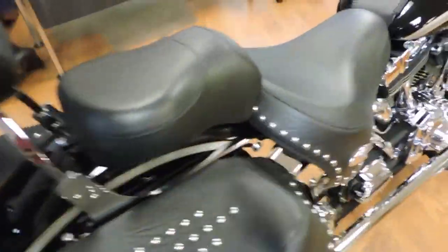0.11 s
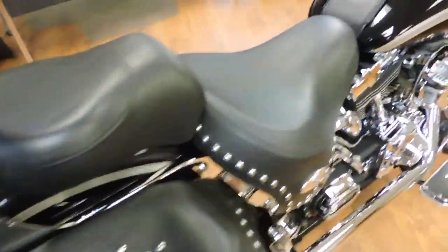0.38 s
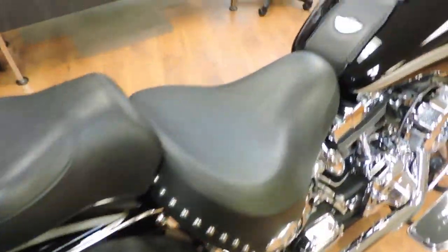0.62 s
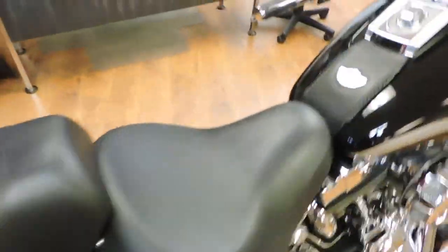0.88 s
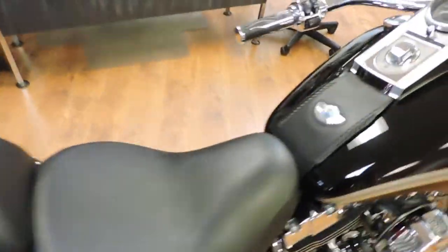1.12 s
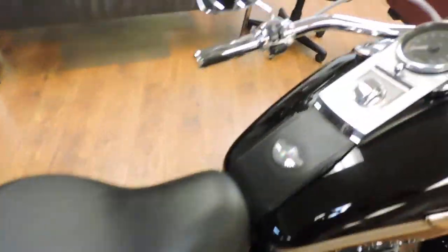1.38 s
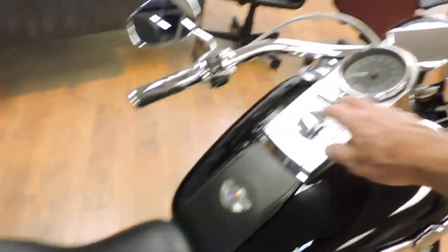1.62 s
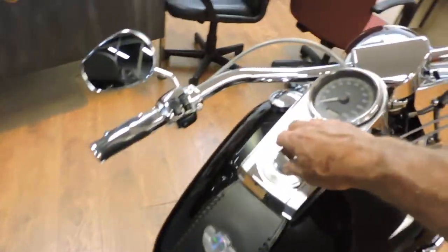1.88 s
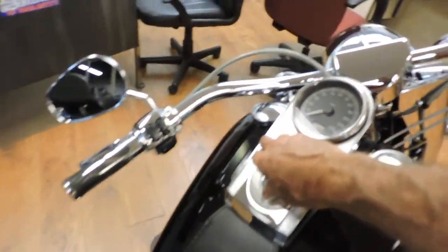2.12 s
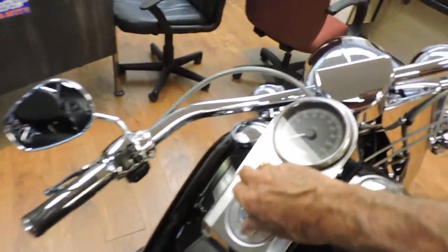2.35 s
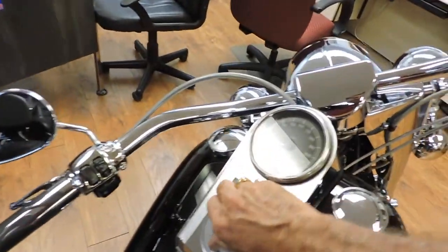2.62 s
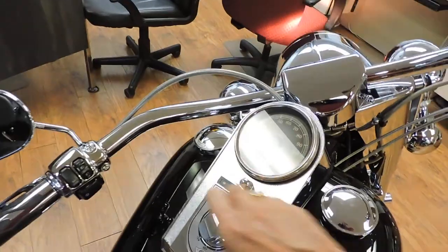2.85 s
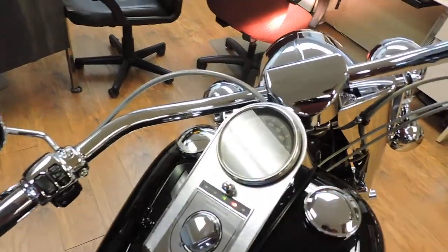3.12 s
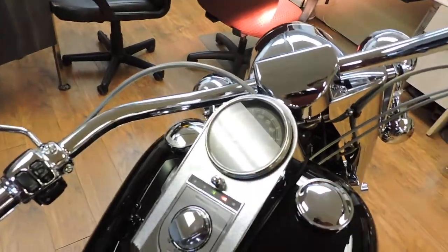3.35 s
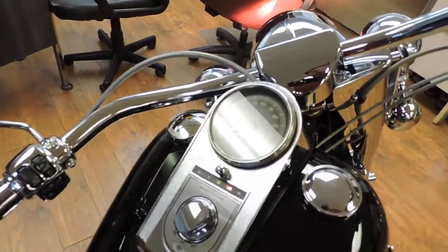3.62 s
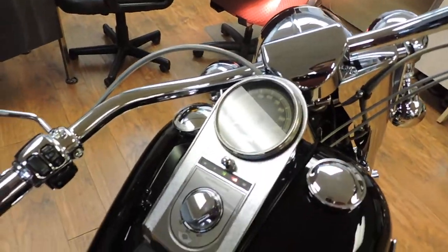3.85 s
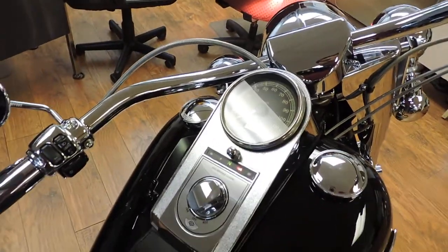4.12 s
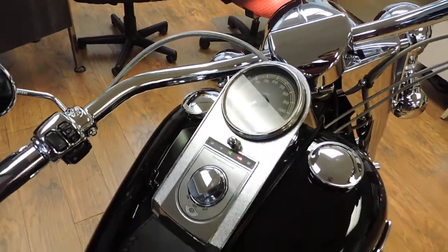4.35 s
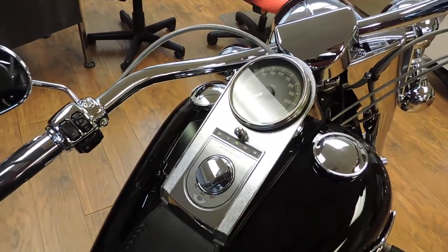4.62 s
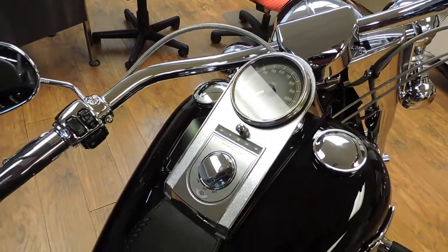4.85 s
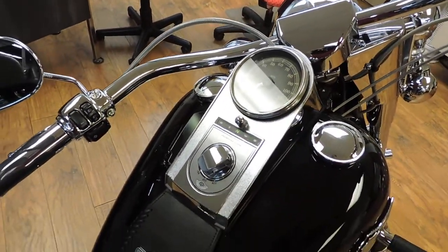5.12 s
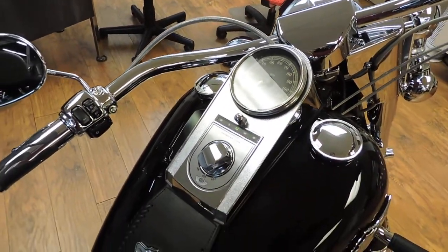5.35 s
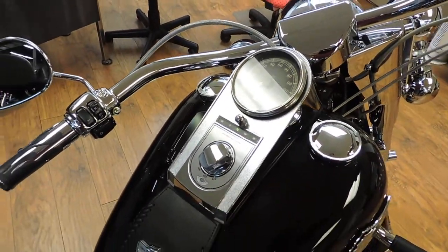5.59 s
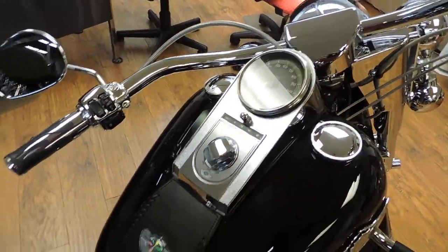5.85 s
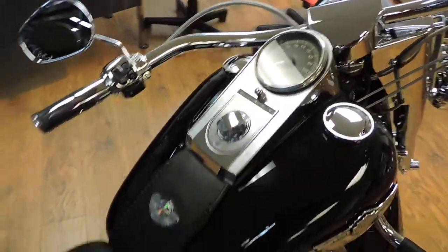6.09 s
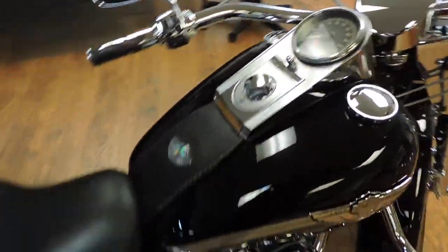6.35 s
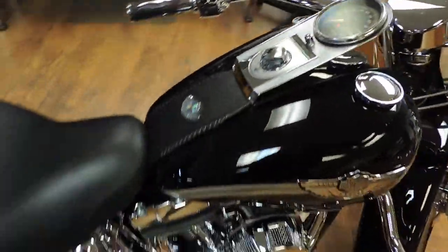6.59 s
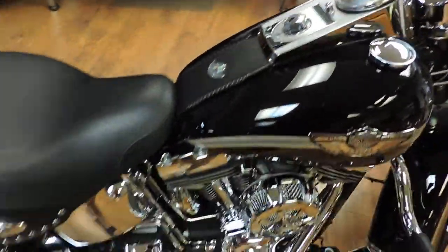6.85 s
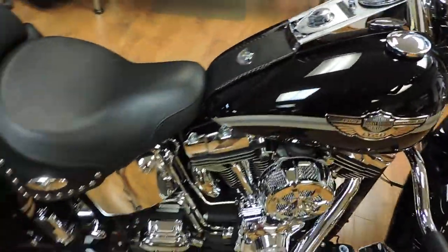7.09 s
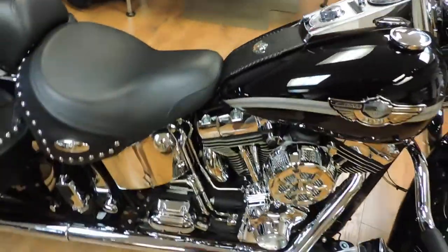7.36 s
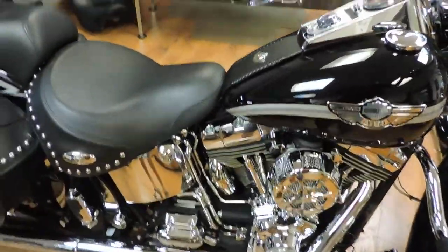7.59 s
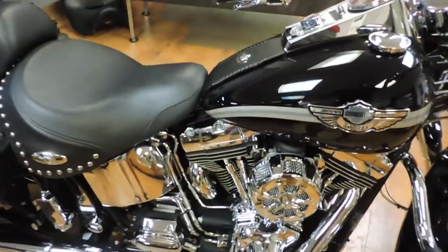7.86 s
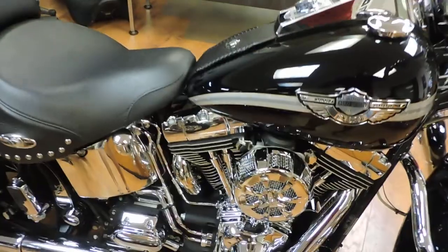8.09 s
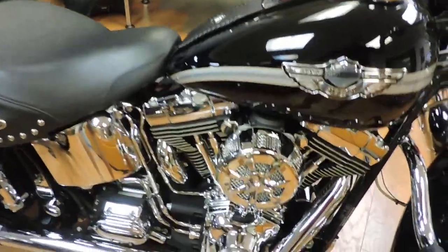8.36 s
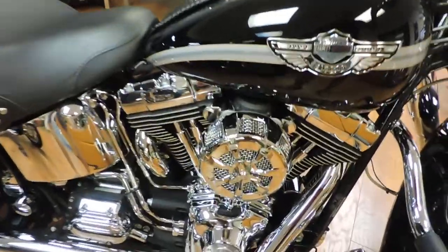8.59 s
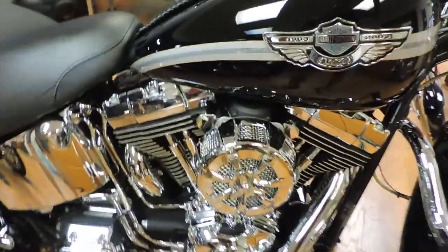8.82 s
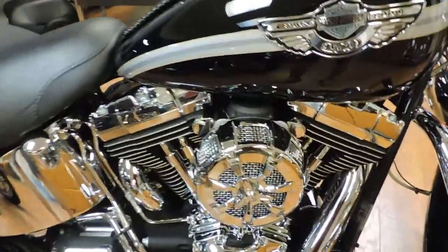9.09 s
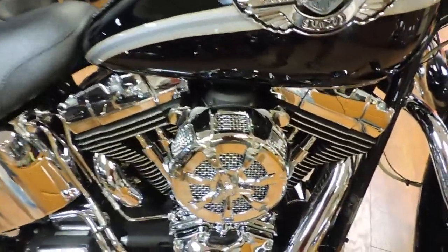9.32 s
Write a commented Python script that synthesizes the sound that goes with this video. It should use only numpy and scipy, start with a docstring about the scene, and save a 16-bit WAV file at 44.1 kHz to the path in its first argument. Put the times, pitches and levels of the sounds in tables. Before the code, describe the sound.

Quiet ventilation first, then a sharp double clack of a console switch. Later a solenoid click, heavy gear slam and labouring starter whine lead into deep motorcycle exhaust thumps. Two throttle blips swell into a booming, barking roar, each falling back, before an uneven idle with metallic ringing and valve clatter. Heard very close, with short reflections from hard walls.

```python
"""A motorcycle starts in a showroom

A big V-twin starts close by: switch contacts crack and ring the console, then the starter slams in and cranks
with noise and a gliding whine. The engine catches, is blipped twice and falls to a loping idle: each firing
thumps the pipe, rings the metal shells and spits noise, while the valve gear clatters.
Ventilation noise fills the hall, and its hard walls and floor answer with a fading noise tail.
"""
import sys
import numpy as np
from scipy import signal
from scipy.fft import rfft, irfft, next_fast_len
from scipy.io import wavfile
from scipy.ndimage import map_coordinates

SR = 44100
rng = np.random.default_rng(int(sys.argv[2]) if len(sys.argv) > 2 else 0)


def dump(signal):
    """Clip the signal to [-1, 1] and save it as 16-bit WAV at the path in sys.argv[1]."""
    limited = np.clip(np.atleast_2d(signal).T, -1, 1)
    pcm = np.round(limited * 32767).astype(np.int16)
    wavfile.write(sys.argv[1], SR, pcm)


def amplitude_ratio(level_db):
    """Convert a level in decibels to the matching linear amplitude (field) ratio."""
    exponent = np.asarray(level_db, float) / 20
    return 10 ** exponent


N = 417186  # length in samples

# Engine speed from the first firing on. Each row: time in seconds, firings per second.
SPEED = [(4.7256, 10.556), (5.0, 11.843), (5.4, 12.397), (5.7, 17.59), (6.02, 28.08), (6.24, 17.14),
         (6.33, 23.096), (6.45, 35.273), (6.6, 37.969), (6.78, 35.385), (6.97, 23.002), (7.13, 28.517),
         (7.3, 39.549), (7.55, 28.915), (7.85, 20.552), (8.05, 15.539), (8.3, 14.941), (9.46, 15.045)]
# Charge burnt per firing, set by the throttle. Each row: time in seconds, load in dB.
LOAD = [(4.7256, -9), (4.83, -14), (5.0, -22.5), (5.5, -18), (6.02, -18.5), (6.21, -30), (6.25, -16),
        (6.4, -9.5), (6.53, -10), (6.62, -22), (6.97, -21), (7.08, -13), (7.27, -9), (7.37, -19),
        (7.63, -19.5), (7.76, -24), (8.1, -21.5), (8.45, -19)]
EARLY = .064  # every second firing comes early by this share of a beat


def unit(x):
    """Scale a sound to an rms (average strength) of 1."""
    return x / np.sqrt(np.mean(x ** 2) + 1e-20)


def along(points, hz):
    """Read a curve of (Hz, value) points, with pitch on a log axis."""
    f, v = np.transpose(points)
    return np.interp(np.log(hz + 1), np.log(f + 1), v)


def curves(rows):
    """Draw straight lines between rows: one value per sample for each column after the time."""
    s, *columns = np.transpose(rows)
    return [np.interp(np.arange(N) / SR, s, column) for column in columns]


def wobble(rate):
    """A smooth random curve with this many random points a second."""
    knots = rng.standard_normal(int(N * rate / SR) + 4)
    return map_coordinates(knots, [np.arange(N) * rate / SR])


def filtered(x, response):
    """Change the strength and phase of each frequency by a response function."""
    m = next_fast_len(N + SR // 2)  # spare room at the end for ringing
    return irfft(rfft(x, m) * response(np.fft.rfftfreq(m, 1 / SR)), m)[..., :N]


def noise(spectrum):
    """Two unrelated noises coloured by a spectrum, with an rms of 1."""
    white = rng.standard_normal((2, N))
    return unit(filtered(white, lambda hz: amplitude_ratio(along(spectrum, hz))))


def spikes(times, sizes):
    """One single-sample impulse per event."""
    return np.bincount(np.round(np.asarray(times) * SR).astype(int), sizes, N)[:N]


def puff(x, rise, decay):
    """Turn each impulse into a quick rise and an exponential fall (times in seconds)."""
    fall = lambda per_s: signal.lfilter([1], [1, -np.exp(-per_s / SR)], x)
    return fall(1 / abs(decay)) - fall(1 / abs(decay) + 1 / abs(rise))


def resonances(modes):
    """The response of several ringing notes at once, each given as (Hz, width in Hz, dB)."""
    return lambda f: sum(amplitude_ratio(db) * 1j * f * w / (c * c - f * f + 1j * f * w) for c, w, db in modes)


def hall():
    """Ventilation: a lumpy rumble under a smooth hiss; the level dips at two set times and then stays lower."""
    # Each row: pitch in Hz, relative level in dB.
    rumble_colour = [(15, -60), (25, 7), (43, -9.5), (124, 1), (155, -10.5), (179, -1), (220, -11.5),
                     (260, -3), (354, -16.5), (700, -69), (910, -24), (1540, -120)]
    # Each row: pitch in Hz, relative level in dB.
    hiss_colour = [(240, -31), (400, -2), (540, -10.5), (685, -6), (729, -9), (1290, -12), (1570, -14.5),
                   (3610, -29), (5140, -31), (6890, -45), (15800, -55)]
    # Dips at set times, at the switch and at the starter slam. Each row: start in seconds, depth in dB.
    dips = [(2.64, 4.2), (4.26, 8)]
    deepest_s = .2  # delay from the start of a dip to its deepest point
    after = [np.clip(np.arange(N) / SR - s, 0, None) / deepest_s for s, _ in dips]
    dip_db = sum(db * u * np.exp(1 - u) for u, (_, db) in zip(after, dips))
    dip_db = dip_db + 3.5 * np.clip(after[-1], 0, 1)  # dB that stay lost from the second dip on
    rumble = amplitude_ratio(-33 - dip_db + 0.49 * wobble(7.4)) * noise(rumble_colour)
    hiss = amplitude_ratio(-38 - dip_db + .3 * wobble(3)) * noise(hiss_colour)
    return rumble + hiss


def switch():
    """The detent snaps, seats and bounces; each contact cracks and briefly rings the console."""
    # Contacts. Each row: start in seconds, relative level in dB.
    contacts = [(2.64, -4), (2.646, -10.5), (2.667, -20)]
    # Console notes. Each row: pitch in Hz, relative level in dB, seconds to fade by 60 dB.
    console = [(461, 1.5, 0.089), (751, 9.5, 0.092), (1060, -6, 0.034), (1760, 2, 0.049), (2270, -1, 0.024)]
    # Colour of the crack. Each row: pitch in Hz, relative level in dB.
    crack_colour = [(150, -44), (250, -18), (1060, 2), (1280, -11), (2190, -13.5), (2650, -27), (2940, -18),
                    (3260, -27), (15800, -44)]
    # A small finger tick: start in seconds, relative level in dB.
    finger_tick = (2.435, -43)
    out, t = np.zeros((2, N)), np.arange(SR // 4) / SR
    grit = noise(crack_colour)
    ring = sum(amplitude_ratio(level - 60 * t / t60) * np.sin(2 * np.pi * hz * t) for hz, level, t60 in console)
    for s, db in contacts:
        out[:, round(s * SR):][:, :len(t)] += amplitude_ratio(db - 14) * ring
        out += puff(spikes([s - .001], [amplitude_ratio(db - 4.5)]), rise=0.00042, decay=0.0067) * grit
    tick_s, tick_db = finger_tick
    tick = puff(spikes([tick_s], [amplitude_ratio(tick_db)]), rise=0.00022, decay=0.00079)
    return out + tick * np.diff(rng.standard_normal(N + 2), n=2)  # differences make the noise bright


def starter():
    """Solenoid click, pinion slam and grind, a rough gear whine, and clutch zings as the engine overtakes."""
    # Starter labouring over two compressions. Each row: time in seconds, whine pitch in Hz, effort in dB.
    crank = [(4.263, 943, -33), (4.39, 1100, -34), (4.45, 1338, -31), (4.49, 1200, -27.5),
             (4.54, 1450, -33), (4.6, 1100, -37), (4.64, 1594, -32), (4.69, 1385, -28.5), (4.78, 1350, -50)]
    # Colour of the grind. Each row: pitch in Hz, relative level in dB.
    grind_colour = [(120, -39), (200, -1.5), (231, -17), (346, 1), (588, -7.5), (964, -2), (1390, -1),
                    (1900, -7.5), (2940, -10), (3530, -12.5), (5280, -16), (10800, -25), (15800, -32)]
    # Clutch zings. Each row: start in seconds, pitch in Hz, relative level in dB, seconds to fade by 60 dB.
    zings = [(4.726, 10400, -20.5, 0.053), (4.83, 9640, -34, .25)]
    # Contact click and plunger travel: start in seconds, relative level in dB, decay in seconds.
    solenoid = (4.239, -36, .02)
    # Pinion meets the ring gear: start in seconds, relative level in dB, rise and decay in seconds.
    slam = (4.257, -8.5, .004, .023)
    t = np.arange(N) / SR
    whine_hz, effort_db = curves(crank)
    on = (t > crank[0][0]) & (t < crank[-1][0])

    octave = amplitude_ratio(5) * np.exp(-((t - 4.4) / .08) ** 2)  # sounds only around the first run-up, at 4.4 s
    turn = 2 * np.pi * np.cumsum(whine_hz * (1 + .044 * wobble(200))) / SR
    whine_db = -36 + 1.3 * (effort_db + 32)  # the whine grows faster than the effort
    tones = np.sin(turn) + octave * np.sin(2 * turn) + 0.36 * np.sin(turn / 4)
    whine = amplitude_ratio(whine_db + 3.6 * wobble(80)) * tones

    click_s, click_db, click_decay = solenoid
    slam_s, slam_db, slam_rise, slam_decay = slam
    hits = puff(spikes([click_s], [amplitude_ratio(click_db)]), .001, click_decay)
    hits = hits + puff(spikes([slam_s], [amplitude_ratio(slam_db)]), slam_rise, slam_decay)
    grind = (on * amplitude_ratio(effort_db) + hits) * amplitude_ratio(1.66 * wobble(90)) * noise(grind_colour)

    zing = 0
    for s, hz, db, t60 in zings:
        burst = puff(spikes([s], [amplitude_ratio(db)]), 0.0027, t60 / np.log(1000))
        zing = zing + burst * noise([(hz - 2500, -40), (hz, 0), (hz + 2500, -40)])
    return grind + on * whine + zing


def beats():
    """Count firings so far at each sample by adding up the speed; the first one is number 1."""
    running = np.arange(N) / SR >= SPEED[0][0]
    return 1 - EARLY + np.cumsum(curves(SPEED)[0] * running) / SR


def law(rule, load_db, rate):
    """A level in dB from load and speed, with separate slopes above and below idle speed."""
    idle_db, idle_rate = -19, 15  # load in dB and firings per second
    at_idle, per_load_db, per_rate_above, per_rate_below = rule
    above = rate - idle_rate
    return at_idle + per_load_db * (load_db - idle_db) + np.where(above > 0, per_rate_above, per_rate_below) * above


def firings():
    """Times and levels of all firings, in the uneven beat of a V-twin that lopes when slow and unloaded."""
    # Levels before mixing: dB at idle, dB per dB of load, dB per firing a second above idle, same below.
    thump_law = (-25.5, 1.3, .33, 2.5)
    # The same four columns, for the lowest pipe notes.
    boom_law = (-27.5, .3, -.35, .8)
    # The lope goes in fours, one almost a misfire. Each row: changes of bark, thump and boom in dB.
    lope = [(-.3, -2, .5), (1.5, 1, -.5), (-1, .3, 1), (-17, -8, -5)]
    (rate,), (load_db,), count = curves(SPEED), curves(LOAD), beats()
    beat = np.arange(1, int(count[-1]) + 1)
    at = np.searchsorted(count, beat - beat % 2 * EARLY)
    at = np.maximum(at, round(SPEED[0][0] * SR))
    pull = np.gradient(rate, 1 / SR)[at] / 10  # how fast the speed rises
    # The lope fades from 18 to 24 firings per second, and as the pull goes from 0.5 to 1.5.
    loping = np.clip((24 - rate[at]) / 6, 0, 1) * np.clip(1.5 - pull, 0, 1)
    uneven_db = np.tanh(rng.standard_normal((len(beat), 3))) * [2, 3, 2]  # uneven by chance
    bark_db = load_db[at]
    thump_db = law(thump_law, load_db[at], rate[at]) + 6 * (beat == 1)  # the first firing clears the pipe
    boom_db = law(boom_law, load_db[at], rate[at])
    levels = [bark_db, thump_db, boom_db] + loping * np.array(lope)[beat % 4].T + uneven_db.T
    return at / SR, *levels


def drone():
    """At speed, tones at 2 and 2.5 times the firing rate swell as they come near a low pipe note."""
    # Levels before mixing: dB at idle, dB per dB of load, dB per firing a second above idle, same below.
    drone_law = (-26.5, .15, .38, .4)
    # The same four columns, for the upper tone over the lower: it needs load.
    upper_law = (-3, 1.2, -.4, 0)
    # The pipe note: pitch in Hz, width in Hz.
    pipe_note = (68, 36)
    (rate,), (load_db,), count = curves(SPEED), curves(LOAD), beats()
    hz, width = pipe_note
    order = lambda k: np.sin(np.pi * k * count) / (1 + ((k * rate / 2 - hz) / width * 2) ** 2)
    tone = order(4) + amplitude_ratio(law(upper_law, load_db, rate)) * order(5)
    fade_in = np.clip((rate - 16.5) / 5, 0, 1)  # sets in at 16.5 firings per second, full at 21.5
    return fade_in * amplitude_ratio(law(drone_law, load_db, rate) + 2.5 * wobble(12)) * tone


def shells(s, bark_db):
    """Every firing knocks the muffler and cases; each note answers with a new strength, the low ones first."""
    # Muffler shell and engine cases. Each row: pitch in Hz, width in Hz, relative level in dB.
    shell_notes = [(537, 45, -8), (740, 110, -2), (900, 52, -8), (1160, 53, -5.5), (1450, 97, -6.5),
                   (1758, 61, -4), (2724, 168, -8), (3370, 230, -10.5), (4390, 320, -14),
                   (5090, 254, -12.5)]
    # One cylinder favours the notes under 950 Hz by 3 dB, the other those above.
    side = np.outer((-1) ** np.arange(len(s)), np.sign([hz - 950 for hz, *_ in shell_notes]))
    colour_db = 3 * side + 5 * np.tanh(rng.standard_normal(side.shape))
    grit = rng.standard_normal((2, N))
    out = 0
    for (hz, width, db), new_db in zip(shell_notes, colour_db.T):
        knocks = puff(spikes(s - 4 / hz, amplitude_ratio(bark_db + new_db)), rise=0.002, decay=0.011) * grit
        out = out + amplitude_ratio(db) * signal.lfilter(*signal.iirpeak(hz, hz / width, SR), knocks)
    return out


def engine():
    """Each firing pushes gas through the pipe, rings the shells and spits noise; the valve gear clatters on."""
    # Exhaust pipe and hall resonances. Each row: pitch in Hz, width in Hz, relative level in dB.
    pipe_notes = [(172.3, 8.2, 1.5), (195.7, 15.8, 3.5), (238.5, 11.1, 4), (283, 25.6, -4.5),
                  (340, 32, -8.5), (427, 20, -14.5)]
    # Lowest pipe notes. Each row: pitch in Hz, width in Hz, relative level in dB.
    boom_notes = [(57.8, 22.6, 7), (124.6, 29, 2)]
    # Colour of the exhaust bark. Each row: pitch in Hz, relative level in dB.
    bark_colour = [(210, -47), (350, -6), (497, -23.5), (684, 2), (911, -3), (1000, -6.5), (1810, -3.5),
                   (2120, -10), (4010, -17), (5180, -16.5), (8090, -37.5), (12200, -22.5), (15800, -46)]
    # Colour of the valve gear. Each row: pitch in Hz, relative level in dB.
    gear_colour = [(210, -10), (350, -6), (631, -10.5), (729, 0), (1250, -11.5), (1720, -8), (5180, -19),
                   (15800, -32)]
    # Clatter level: dB at idle, dB per dB of load, dB per firing a second above idle, same below.
    clatter_law = (-43.7, .62, .63, -1.3)
    s, bark_db, thump_db, boom_db = firings()
    # The low push leads the hiss, and meets the microphone as a dip first.
    push = -puff(spikes(s - .004, amplitude_ratio(thump_db - 7.5)), rise=0.00061, decay=0.0017)
    churn = puff(spikes(s, amplitude_ratio(thump_db - 23)), rise=0.0017, decay=.03)
    churn = churn * noise([(40, 9), (400, -12), (1000, -2), (3000, -60)])
    front = filtered(push, lambda f: (1j * f / (130 + 1j * f)) ** 2)  # pressure front without its slow part
    thump = amplitude_ratio(29.5) * filtered(push + churn, resonances(pipe_notes)) + amplitude_ratio(5) * front

    # Passing the resonances twice makes the lowest notes build up a little later.
    swell = spikes(s - .001, amplitude_ratio(boom_db))
    boom = amplitude_ratio(51.5) * filtered(swell, lambda f: resonances(boom_notes)(f) ** 2)

    gate = puff(spikes(s - .0015, amplitude_ratio(bark_db - 12.5)), rise=.0016, decay=.02)
    bark = amplitude_ratio(0.5) * gate * amplitude_ratio(2.6 * wobble(200)) * noise(bark_colour)

    clatter_db = law(clatter_law, curves(LOAD)[0], curves(SPEED)[0]) + 0.5 * wobble(40)
    clatter = (beats() > 2) * amplitude_ratio(clatter_db) * noise(gear_colour)
    return thump + boom + drone() + amplitude_ratio(7.5) * shells(s, bark_db) + bark + clatter


def walls(x, wet_db):
    """Pair a sound with a quarter-wave-shifted twin, and give each a fading noise tail thin in deep bass."""
    # How long the hall rings. Each row: pitch in Hz, seconds to fade by 60 dB.
    fade_times = [(100, 1), (1000, 0.17), (5000, 0.3), (14000, 0.15)]
    hz, t, z = signal.stft(rng.standard_normal((2, SR // 2)), SR, nperseg=256)
    fading = z * amplitude_ratio(-60 * t / along(fade_times, hz)[:, None])
    tail = signal.istft(fading, SR, nperseg=256)[1]
    twin = filtered(x[1], lambda f: 1j + 0 * f)
    late = np.pad(x, ((0, 0), (300, 0)))  # the tail starts 300 samples later
    wet = signal.fftconvolve(late, tail / np.linalg.norm(tail[0]), axes=1)[:, :N]
    return np.array([x[0], twin]) + amplitude_ratio(wet_db) * filtered(wet, lambda f: f ** 2 / (f ** 2 + 160 ** 2))


def scene():
    """All sources, as a pair of versions that the microphones mix."""
    return walls(switch(), wet_db=-14.5) + walls(starter() + engine(), wet_db=-6.5) + hall()


def band_limit(x):
    """A steep low-pass at the top of the band."""
    return signal.sosfilt(signal.butter(12, 16510, fs=SR, output="sos"), x)


def record(dry):
    """Close microphone ports hear the bass much alike and the treble apart; loud peaks round off."""
    # Each row: pitch in Hz, left-right likeness (1 is the same).
    likeness = [(60, 0.84), (180, 0.99), (550, 0.92), (1650, 0.37), (4970, 0.02), (15000, 0.05)]
    # Each row: pitch in Hz, left minus right in dB.
    left_over_right = [(60, 0), (150, 2.5), (380, 1.5), (950, 1), (2380, 4), (5980, 10), (9000, -1),
                       (15000, -2.5)]
    turn = lambda hz: np.arccos(np.clip(along(likeness, hz), -1, 1)) / 2
    mid, side = filtered(dry, lambda hz: np.array([np.cos(turn(hz)), np.sin(turn(hz))]))
    pair = np.array([mid + side, mid - side])
    tilt = lambda hz: amplitude_ratio(along(left_over_right, hz) / 2 * np.array([[1], [-1]]))
    pair = filtered(pair, lambda hz: tilt(hz) * (hz < 15870))  # nothing above 15870 Hz
    pair = filtered(pair, lambda hz: hz ** 4 / (hz ** 4 + 33 ** 4))  # small capsules lose the deepest bass
    pair = pair / (1 + np.abs(pair / .98) ** 6) ** (1 / 6)  # peaks bend over towards 0.98
    return band_limit(pair)


dry = scene()
out = record(dry)
dump(out)
```